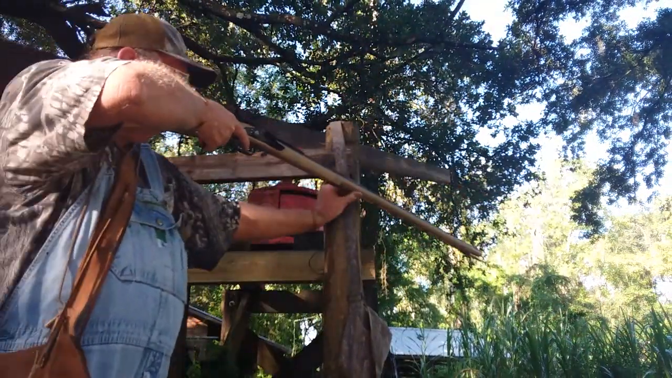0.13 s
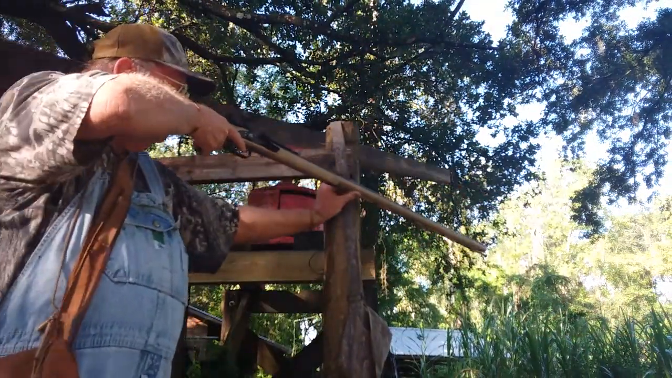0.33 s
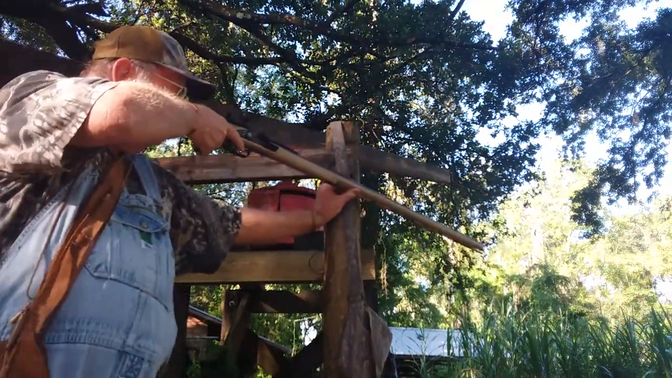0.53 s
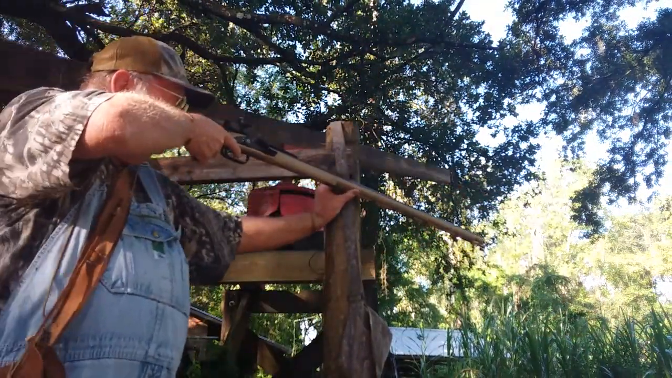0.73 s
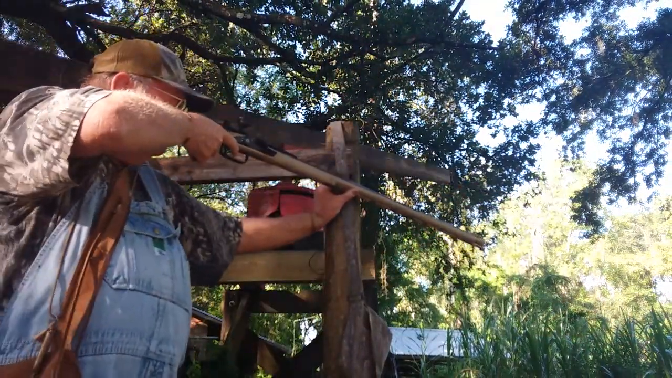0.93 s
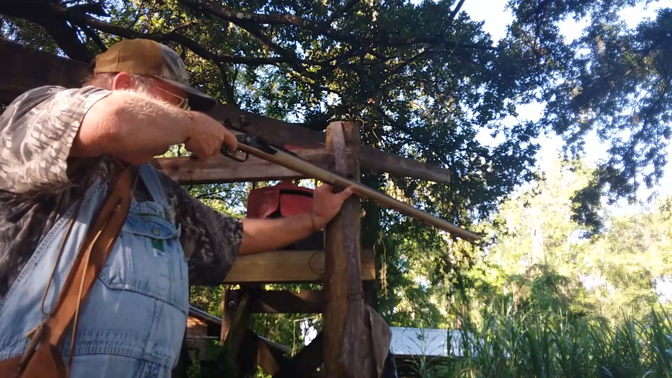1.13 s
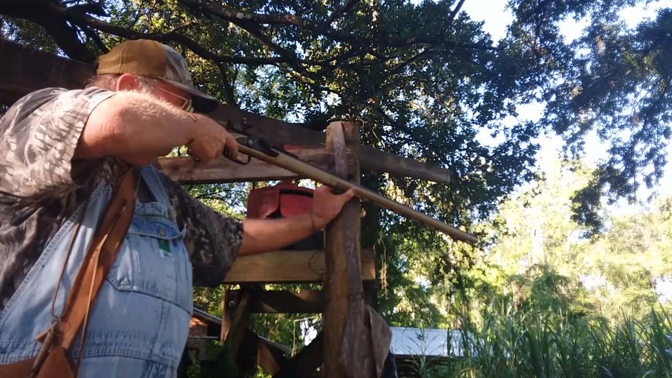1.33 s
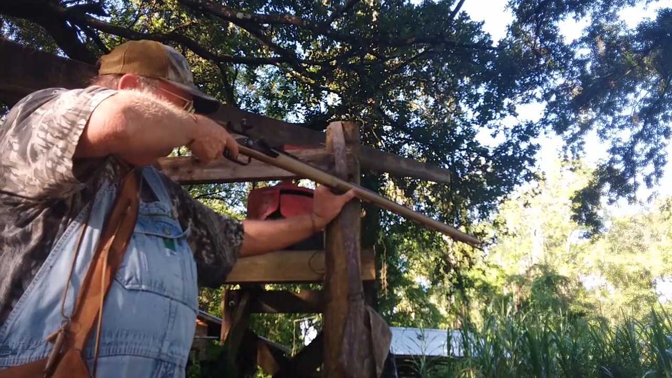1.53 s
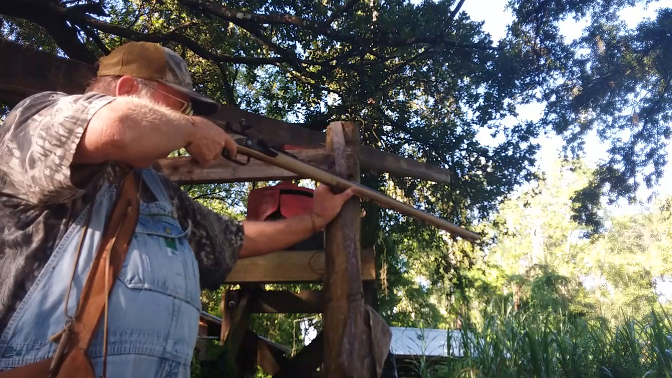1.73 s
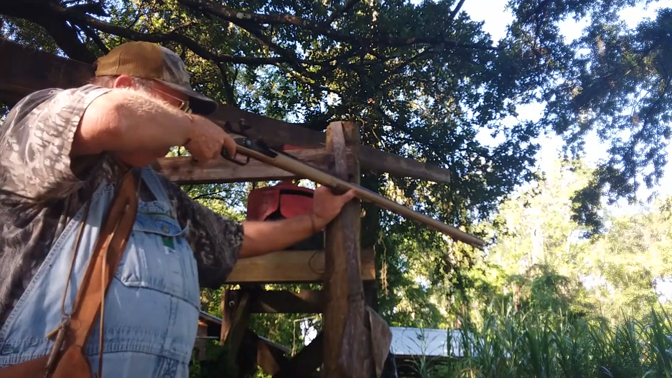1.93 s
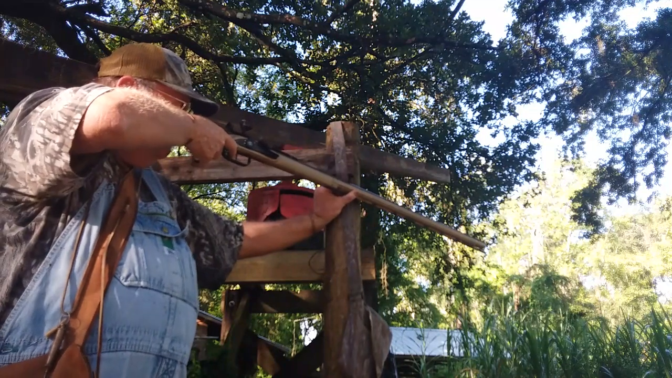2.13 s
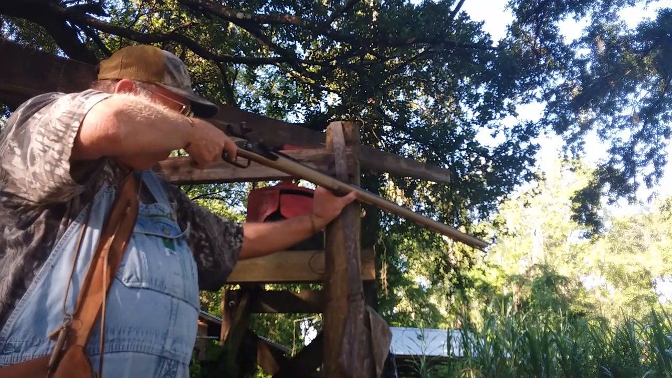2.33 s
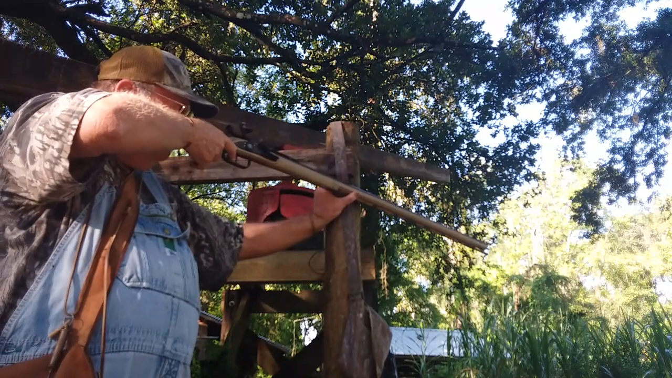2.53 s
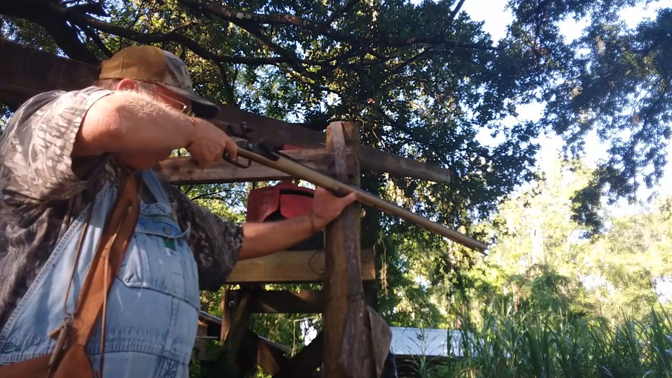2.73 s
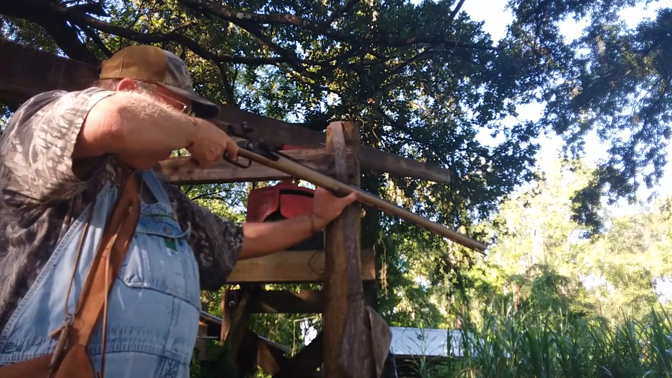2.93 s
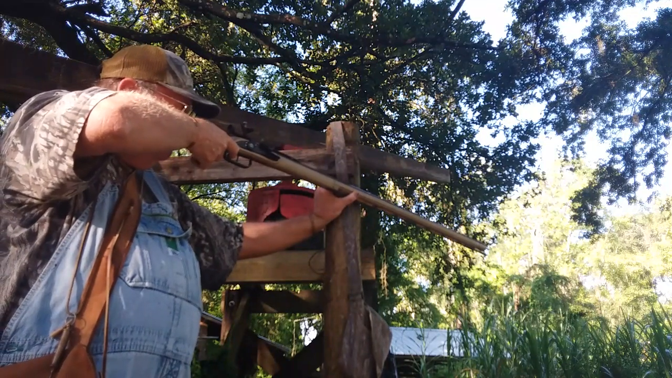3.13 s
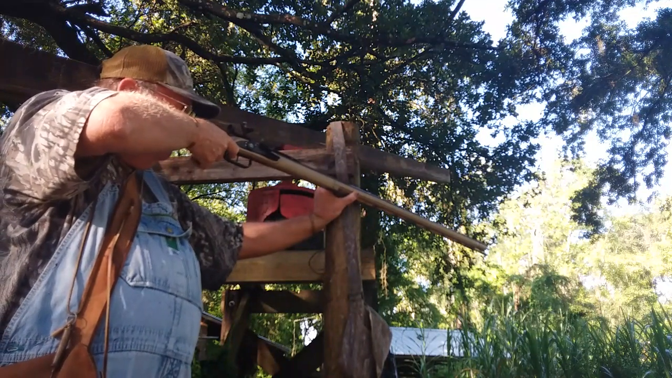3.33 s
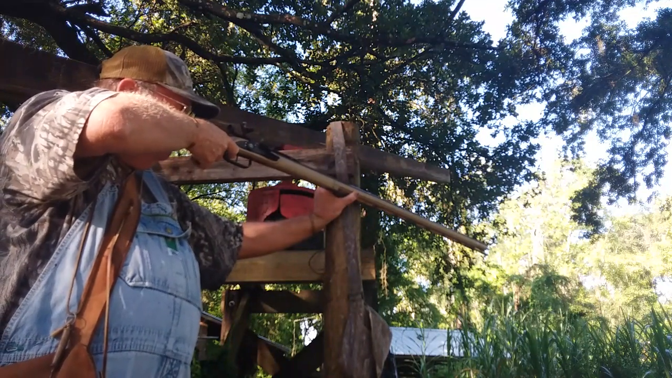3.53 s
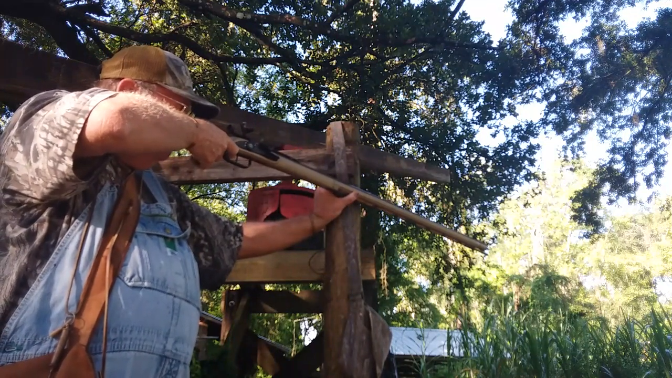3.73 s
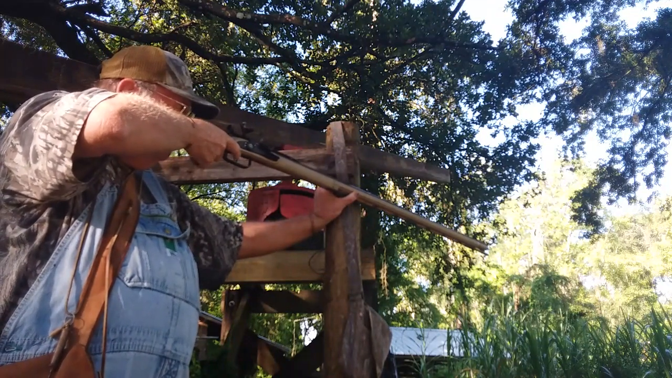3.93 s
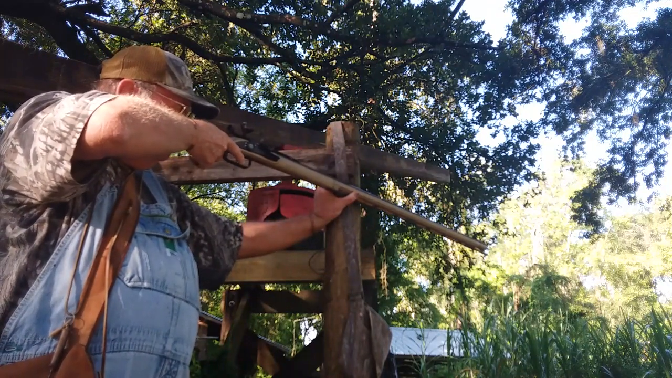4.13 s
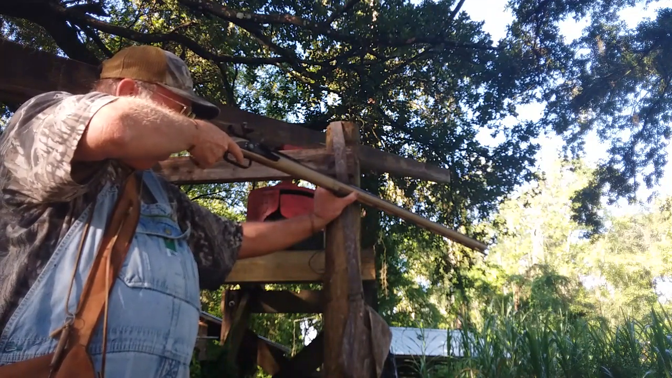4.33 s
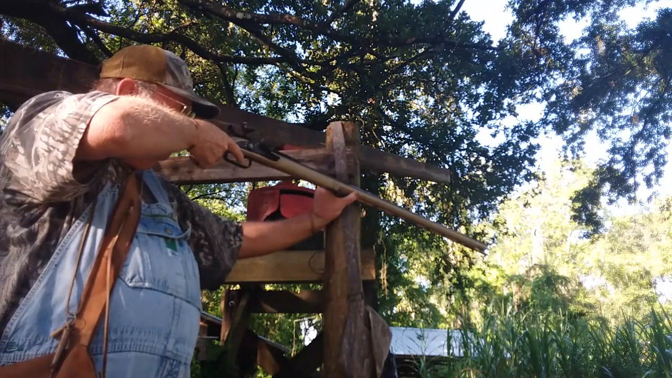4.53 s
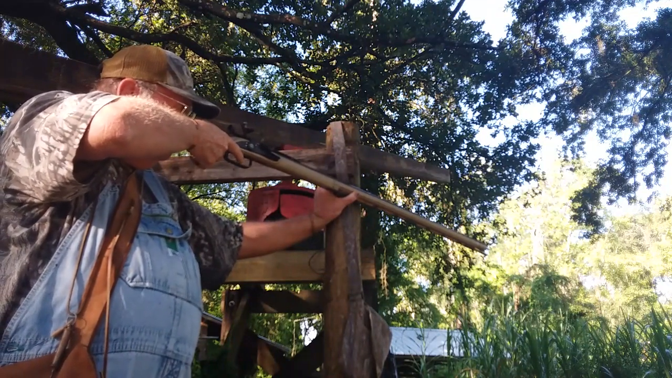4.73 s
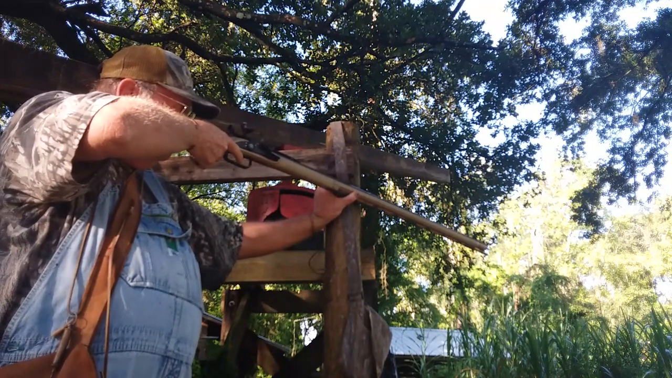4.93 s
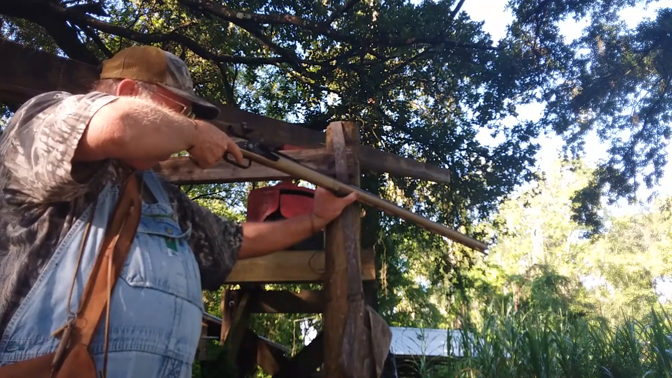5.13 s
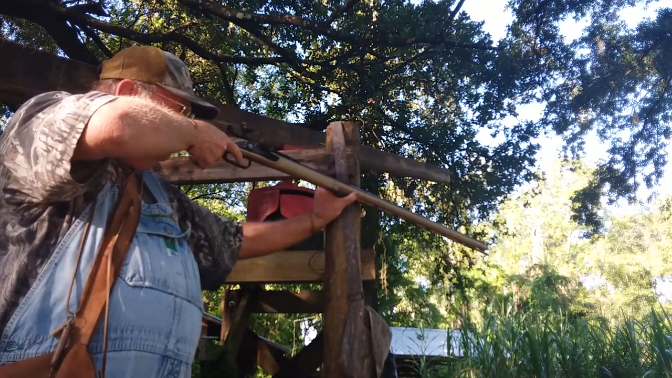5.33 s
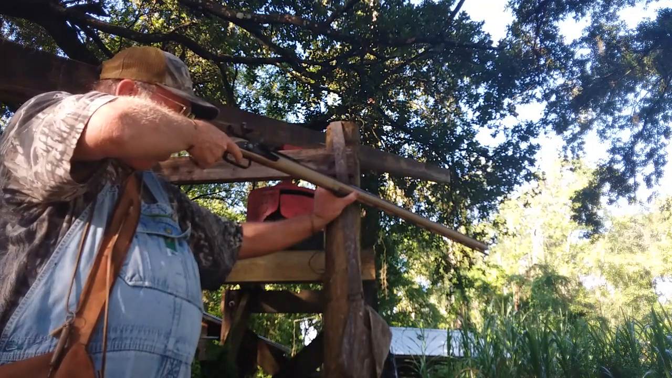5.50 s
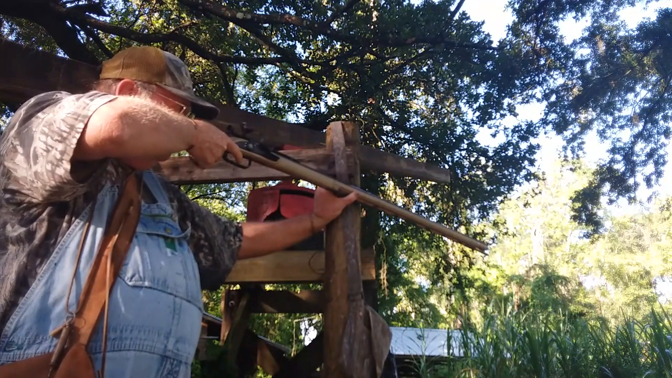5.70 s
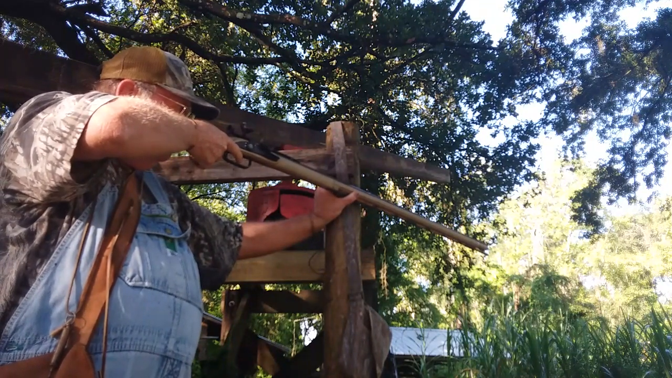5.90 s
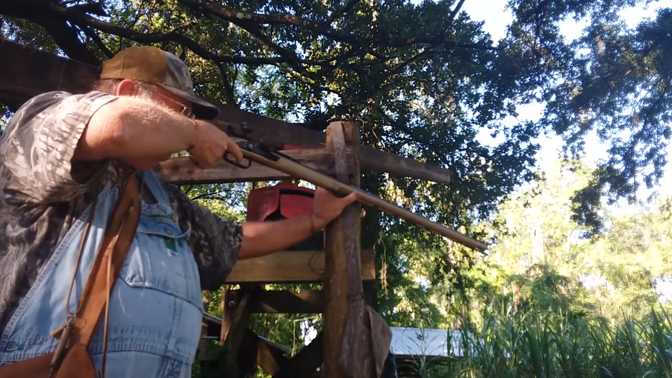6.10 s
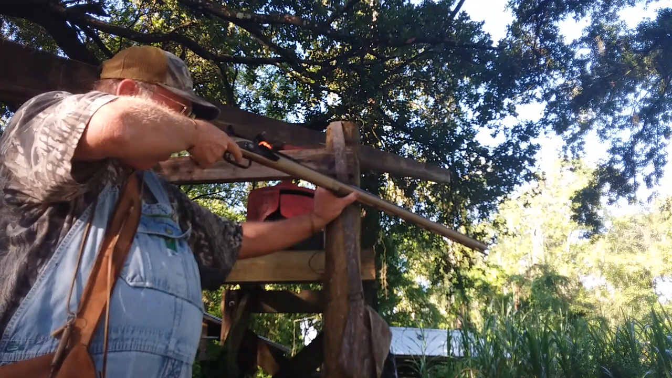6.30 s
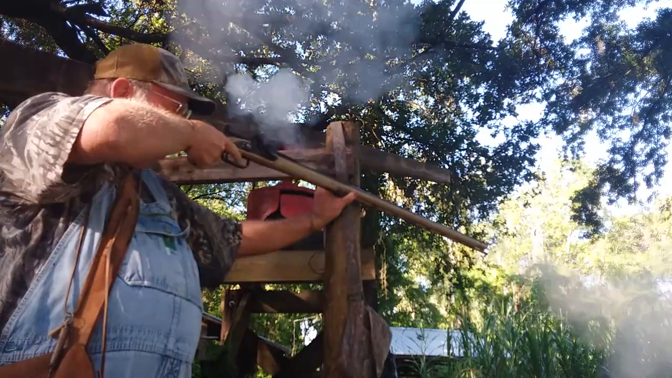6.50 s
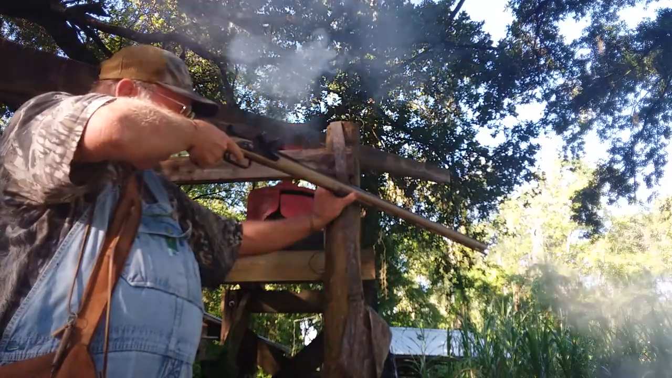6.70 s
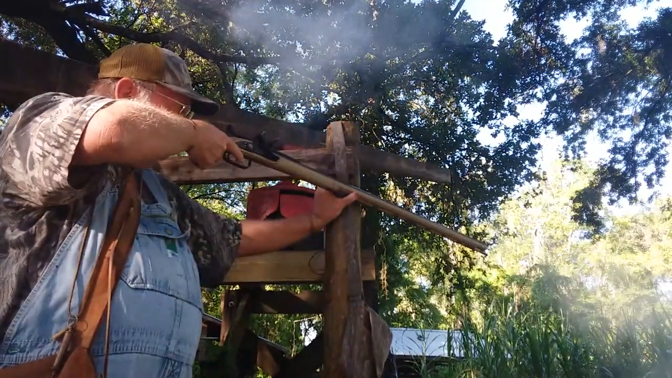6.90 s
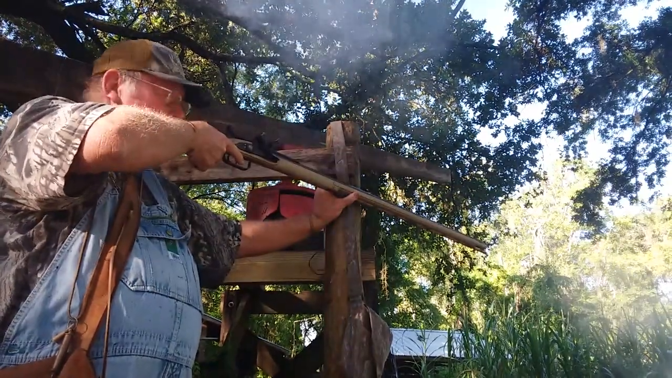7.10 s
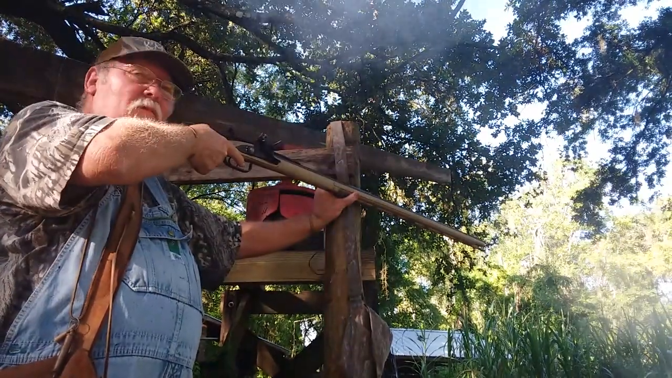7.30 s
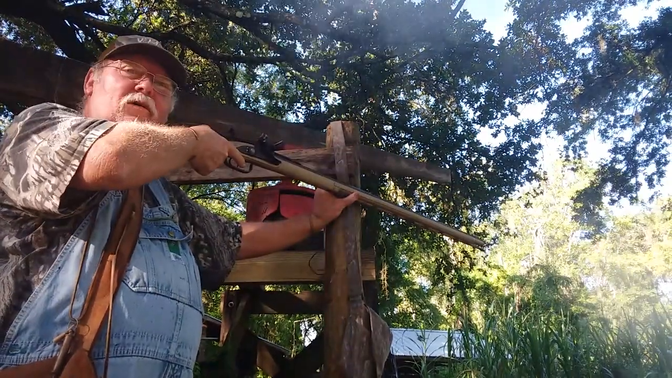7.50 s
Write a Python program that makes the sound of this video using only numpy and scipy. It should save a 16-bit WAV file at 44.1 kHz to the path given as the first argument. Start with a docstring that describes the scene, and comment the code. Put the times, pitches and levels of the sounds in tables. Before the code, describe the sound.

Beside a man aiming a flintlock, one microphone hears soft fabric rubs and light taps on wood, one of them a hard clack, over quiet air and insects. Distant hoarse crows and a thin bird whistle come and go around a small metallic double click. Then a bright metal clatter runs almost at once into a hiss and a massive blast, with crackling echoes rolling away to the end and the background pushed down.

```python
"""Edge of a wood, one microphone beside the shooter, over steady air, insects and a distant engine.
Cloth rustles and the stock is knocked as a flintlock rifle is shouldered; far crows start to caw.
A songbird whistles as the set trigger clicks, and whistles again before flint and frizzen clatter.
The pan fizzes, then the charge goes off: noise, shaped band by band, dies away as echoes off the trees.
The recorder turns its gain far down at the blast and stays low."""
import sys
import numpy as np
from scipy import signal
from scipy.fft import rfft, irfft
from scipy.io import wavfile
from scipy.ndimage import uniform_filter1d

SR = 44100
rng = np.random.default_rng(int(sys.argv[2]) if len(sys.argv) > 2 else 0)


def master_out(mix):
    """Clip the mix to full scale and print it as 16-bit PCM to the path in sys.argv[1]."""
    frames = np.transpose(np.atleast_2d(mix))
    ceiling = np.clip(frames, -1, 1)
    pcm = np.round(ceiling * 32767).astype(np.int16)
    wavfile.write(sys.argv[1], SR, pcm)


N = 333173

# relative spectrum of the blast: [f/Hz, density/dB per Hz]
BLAST_SPECTRUM = [(30, -57), (55, -25.5), (100, 2), (200, -9.5), (400, -4), (800, -8.5), (1600, -8.5),
                  (3000, -6.5), (4500, -6.5), (7000, -10.5), (9500, -10.5), (10800, -18.5), (12500, -10.5),
                  (15700, -8.5)]
# how long the near and the far stands of trees ring in each band: [f/Hz, t60/s]
NEAR_TREES = [(60, 0.46), (150, 0.87), (400, 0.49), (1200, 0.82), (3000, 0.7), (6000, 0.67), (10000, 0.65),
              (15000, 0.41)]
FAR_TREES = [(60, 2.3), (300, 1.425), (1000, 1.714), (3000, 1.323), (6000, 1.134), (15000, 0.48)]
# brief, louder patches in the echo tail: [t/s, lift/dB, centre f/Hz, length/s]
LOUD_PATCHES = [(6.426, 2, 354, .035), (6.507, 0.5, 117, .065), (6.532, 5, 6250, .06),
                (6.687, 2.5, 3520, .055), (6.96, 2, 2500, .02), (7.075, 2.5, 1500, .02),
                (7.385, 4, 1800, .025), (7.45, 2.5, 1990, .03), (7.54, 3, 1500, .03)]
# single slaps off sheds and banks: [t/s, level over the echoes around/dB, f/Hz]
SLAPS = [(6.392, 0, 334), (6.408, 4.5, 798), (6.434, -1, 447), (6.447, 0, 297), (6.459, 2, 449),
         (6.496, -1.5, 895), (6.506, 1, 140), (6.536, -1, 171), (6.555, -3, 200), (6.584, -5, 170.5)]
# hiss of the priming powder: [t/s, level/dB]
PAN_HISS = [(6.256, -37), (6.275, -27.5), (6.31, -22.5), (6.335, -33.5), (6.36, -37.5)]
# blows inside the lock, set trigger first, then cock, flint and bouncing frizzen:
# [t/s, level before colouring/dB, brightness/dB per octave, scrape share/0-1, damping t60/s]
LOCK_BLOWS = [(3.5754, -13, 4.5, 0.3, 0.04), (3.5775, -14, 5, .4, 0.041), (3.580, -20, 0, .06, .1),
              (6.257, 0, 1, 0.66, .022), (6.2607, -13, 2, .9, .014), (6.265, -7, 1, .4, 0.0097),
              (6.2731, -6.5, 0, .6, .02), (6.2739, -1.5, -2, 0.8, 0.055), (6.280, -8, -3.5, .7, 0.015),
              (6.2906, -2.5, 0.5, .7, .016), (6.3023, -8, 0.5, .6, 0.016), (6.3109, -7, -1.5, .7, 0.013),
              (6.3175, -17, -6, .7, .014)]
# ringing modes of the lock parts, before the grip damps them: [f/Hz, base level/dB, t60/s]
LOCK_MODES = [(1160, -22, 0.057), (1730, -16, .05), (2200, -24, .043), (3230, -16.5, 0.022),
              (4380, -6.5, .025), (5750, -3.5, 0.013), (6570, -8, 0.039), (7450, -4.5, 0.035),
              (8390, -7, .024), (9300, -10.5, 0.036), (9900, -9, .03), (11100, -22.5, .035),
              (12340, -20, .037), (13800, -18.5, .03), (15200, -12, .03), (15200, -16, .03)]
# knocks and light taps on the wooden stock and rail: [t/s, peak level/dB, f/Hz, t60/s]
TAPS = [(.258, -43, 780, .036), (0.307, -47, 495, 0.046), (0.361, -46.5, 477, 0.017),
        (.442, -45, 4020, 0.0087), (.55, -48, 800, 0.017), (0.638, -46, 1000, 0.015),
        (.714, -50, 890, .014), (.885, -48, 3200, 0.019), (.997, -47, 2500, .01),
        (1.049, -29, 1750, 0.0078), (1.0497, -18.5, 3520, 0.017), (1.053, -28.5, 3200, 0.023),
        (1.104, -47, 3000, .01), (1.128, -50.5, 315, 0.046), (1.348, -38, 2780, 0.039),
        (1.377, -46, 1270, 0.036), (2.539, -52, 3000, .01), (3.769, -45.5, 4500, .009)]
# cloth and leather as the rifle comes up, one row a rub; the first row would start before zero, # so it is
# mixed in at the very end of the scene instead, a faint rise cut off before its peak: # [peak t/s, level/dB,
# swell/s, scuff level/dB, scuff f at the peak/Hz]
RUBS = [(.1, -63, .12, -80, 800), (.245, -44.5, 0.045, -57, 750), (.29, -46.5, 0.014, -52.5, 590),
        (0.361, -55.5, 0.083, -61, 417), (.45, -62, .05, -74, 500), (.53, -43, 0.028, -62, 690),
        (.62, -46.5, 0.044, -59.5, 746), (.69, -52, 0.045, -67, 800), (.8, -61, .06, -81, 800),
        (.89, -54.5, 0.036, -70, 600), (.98, -55.5, 0.053, -61.5, 547), (1.1, -63, .04, -66, 600),
        (1.39, -56.5, 0.048, -69, 705)]
# relative spectrum of rubbing cloth: [f/Hz, density/dB per Hz]
CLOTH_SPECTRUM = [(590, -31), (1000, -10), (2460, -4.5), (4320, -3), (7010, -3.5), (8820, 0), (11000, -9.5),
                  (12900, -5), (15700, -7)]
# songbird, one row a note that slides and settles:
# [t/s, length/s, starting level/dB, from f/Hz, to f/Hz, slide/s]
WHISTLES = [(3.099, .19, -76.5, 3400, 3020, .1), (3.37, 0.19, -69, 3780, 3335, .042),
            (5.918, 0.053, -77, 3700, 2830, .045), (5.963, 0.08, -61.5, 2680, 3280, 0.056),
            (6.052, 0.075, -65.5, 3300, 4310, .06), (6.142, 0.089, -62.5, 3850, 3740, .05)]
# far crows, one row a caw: [t/s, length/s, level/dB, f halfway through/Hz, overtone level/dB,
# share of the caw at which the low partial is loudest/0-1]
CAWS = [(0.798, 0.11, -70, 1290, -6, .5), (1.402, 0.19, -75, 1300, 1, .5),
        (1.857, .44, -72.5, 1300, 5, 0.83), (2.38, 0.14, -74, 1440, 1, .4), (2.478, 0.27, -72, 1234, 1, 1),
        (3.138, 0.24, -72, 1275, -0.5, .55), (3.698, 0.27, -68, 1310, -3, 0.61),
        (4.257, 0.31, -69, 1264, -3, 0.61), (4.858, 0.27, -66, 1300, -4.5, 0.55),
        (5.677, .16, -92, 1270, 16, .5), (5.936, .16, -69, 1370, 2, .6)]
# relative spectrum of the open air, rumble and broad hiss: [f/Hz, density/dB per Hz]
AIR_SPECTRUM = [(20, -35.5), (40, -21.5), (85, 4.5), (130, -5.5), (200, -13), (300, -29), (420, -32.5),
                (800, -33.5), (1400, -36.5), (5250, -37.5), (5600, -25), (7000, -36.5), (10500, -28.5),
                (15700, -26.5)]
# high hissing bands of the insects: [f/Hz, width/Hz, level before the slight dips/dB]
INSECT_BANDS = [(6120, 530, -66.5), (8575, 1390, -57.5), (12300, 1700, -64.5)]
# slight dips in the level of the high hiss bands: [t/s, level/dB]
HISS_LEVEL = [(0, 0), (1.1, -1.5), (1.6, 0), (7.6, -1.5)]
# far road: [t/s, engine drone level/dB, low wash level/dB]
TRAFFIC = [(0, -74, -68.5), (.5, -53.5, -64), (1.4, -57, -69), (3.2, -54, -71.5), (3.9, -64.5, -74.5),
           (5.1, -60, -75), (6.2, -64, -72.5)]

SHOT_S, BLAST_RISE_S = 6.3562, .007
BASS_RISE_S = 0.016  # time constant of the build-up of a 300 Hz echo; higher tones are quicker
CRACKLE_DB = 1.7  # unevenness of the single echoes
RUB_SLOPE_DB, RUB_FADE = 8.5, 1.3  # dB lost per swell time; the fade is this much slower than the rise
SCUFF_SAG = 1.5  # rate at which the scuff pitch sinks, per second
TAP_WIDTH_HZ, TAP_WIDENING = 590, 1.26  # width of a 1 kHz tap; higher taps broaden by this power
CAW_RISE, OVER_RATIO, OVER_RISE = .05, 1.97, .08  # pitch climbs through the caw, the overtone more
OVER_PEAK, CAW_ENDS_DB = 0.48, -9.5  # share of the caw where the overtone peaks; level at the ends
THIRD_DB = -5.5  # third partial, only a haze
NOTE_EDGE, NOTE_RISE_DB = 0.15, 1  # share of a note spent swelling and dying; level gained by its end
WARBLE, BIRD_ECHO_DB = .016, 5  # rms pitch wobble as a share of the pitch; echo filter gain
AIR_DB, ENGINE_HZ, ENGINE_WIDTH_HZ = -54, 94.3, 26.6
RECOVER_DB_PER_S = 2.2  # the slow gain control lets go this fast
LAG = 90  # samples by which the level sensing trails
CEILING, TREBLE_EDGE_HZ, SELF_NOISE_DB = 1.35, 15800, -74  # CEILING: full scale is 1


def shot():
    """The blast returns from trunks and boughs: uneven echoes, each band dying at its own speed."""
    t = np.arange(N - round(SHOT_S * SR)) / SR

    def field_db(hz, s):
        """Near and far stands of trees, plus a few brief, louder patches."""
        near = gain_of(-60 * s / read(NEAR_TREES, hz))
        far = gain_of(-20.0 - 60 * s / read(FAR_TREES, hz))
        lift = 0
        for at, db, mid, length in LOUD_PATCHES:
            octaves = np.log2((hz + 1) / mid)
            lift = lift + db * np.exp(-((s + SHOT_S - at) / length) ** 2 - octaves ** 2 / 0.73)
        build_up = -9 * np.exp(-s * (hz + 1) / 300 / BASS_RISE_S)
        return read(BLAST_SPECTRUM, hz) + 10 * np.log10(near ** 2 + far ** 2) + lift + build_up

    tail = shape(lumps(len(t), size=28, spread_db=CRACKLE_DB), field_db, size=1024)
    flicker = evened(uniform_filter1d(rng.standard_normal(len(t)), size=900))
    tail = tail * gain_of(0.87 * flicker)  # slow random flicker of the whole tail
    tail = tail + slaps(tail)
    onset = np.clip(t / BLAST_RISE_S, 0, 1) ** 3
    return SHOT_S, gain_of(26) * tail / np.std(tail[:4000]) * onset


def slaps(tail):
    """Each slap is one pulse about a cycle long, scaled by the level of the diffuse echoes around it."""
    t, out = np.arange(len(tail)) / SR + SHOT_S, np.zeros(len(tail))
    around = np.sqrt(abs(uniform_filter1d(tail ** 2, size=2000)))
    for s, db, hz in SLAPS:
        turns = (t - s) * hz
        out += gain_of(db) * np.exp(-(1.6 * turns) ** 2) * np.sin(2 * np.pi * turns)
    return out * around


def flash():
    """The priming powder burns in the pan with a fizz and a soft low puff, both bands of noise."""
    t = np.arange(PAN_HISS[0][0], PAN_HISS[-1][0], 1 / SR)
    noise = rng.standard_normal((len(t), 2)).T
    fizz = gain_of(along(PAN_HISS, t)[0]) * band(noise[0], 6000, 9000)
    puff = gain_of(-30) * band(noise[1], 250, 300) * np.exp(-((t - 6.338) / 0.0079) ** 2)
    return t[0], fizz + puff


def blow(s, level_db, bright_db, scrape, t60):
    """Steel on steel: the lock's modes ring under a brief scrape of noise; the grip damps both."""
    t = np.arange(4000) / SR
    ring = np.zeros(len(t))
    for hz, db, ring_s in LOCK_MODES:
        extra, phase = rng.random(2)  # every blow excites the modes a little differently
        ring += gain_of(db + 2.3 * extra - 60 * t / ring_s) * np.sin(2 * np.pi * (hz * t + phase))
    scrape = np.clip(scrape, 0, 1)
    hit = (1 - scrape) * ring / abs(ring).max() + scrape * 0.2 * rng.standard_normal(len(t))
    hit = hit * gain_of(-60 * t / max(t60, .003)) * np.minimum(t / .0008, 1)
    hz = np.fft.rfftfreq(len(t), 1 / SR)
    bass_cut_db = 22 * np.maximum(np.log2(1050 / (hz + 50)), 0)
    colour_db = bright_db * np.log2((hz + 500) / 6000) - bass_cut_db
    hit = gain_of(level_db) * irfft(rfft(hit / abs(hit).max()) * gain_of(colour_db))
    return s, scatter(hit, wet_db=-20, delay_s=0.03, t60=0.35)


def tap(s, peak_db, hz, t60):
    """A short dry noise burst around one tone, with a faint slap from nearby posts."""
    t = np.arange(6000) / SR
    noise = rng.standard_normal((len(t), 2)).T
    burst = noise[0] * gain_of(-60 * t / max(t60, .003)) * np.minimum(t / 0.00053, 1)
    slap = gain_of(-32 - 60 * t / 0.3) * noise[1]
    tone = band(burst + slap, hz, TAP_WIDTH_HZ * (hz / 1000) ** TAP_WIDENING)
    tone = signal.lfilter(*signal.butter(2, min(0.2 * hz, 5000), "high", fs=SR), tone)
    return s, gain_of(peak_db) * tone / abs(tone).max()


def rustle(s, level_db, swell_s, scuff_db, scuff_hz):
    """Dense uneven grains of rubbing cloth swell and fade, with a dull scuff below."""
    t = np.arange(-8000, 12000) / SR
    grains = lumps(len(t), size=64, spread_db=2.5)

    def cloth_db(hz, s):
        """The cloth spectrum, cut by 12 dB an octave more below 1 kHz."""
        return read(CLOTH_SPECTRUM, hz) - 12 * np.maximum(np.log2(1000 / (hz + 1)), 0)

    fibres = gain_of(level_db) * evened(shape(grains, cloth_db, size=512))
    scuff = gain_of(scuff_db) * band(grains, scuff_hz * np.exp(-SCUFF_SAG * t), 820)
    swell = gain_of(-RUB_SLOPE_DB * np.maximum(-t, t / RUB_FADE) / swell_s)
    return s + t[0], swell * signal.windows.tukey(len(t), .2) * (fibres + scuff)


def whistle(s, length, level_db, from_hz, to_hz, slide_s):
    """The songbird's note: a near sine that slides, settles and wobbles, trailed by its echo."""
    t = np.arange(0, length, 1 / SR)
    hz = to_hz + (from_hz - to_hz) * np.maximum(1 - t / slide_s, 0)
    wobble = evened(uniform_filter1d(rng.standard_normal(len(t)), size=300))
    hz = hz * (1 + WARBLE * wobble)
    level = gain_of(level_db + NOTE_RISE_DB * t / length) * signal.windows.tukey(len(t), NOTE_EDGE)
    tone = level * np.sin(2 * np.pi * np.cumsum(hz) / SR)
    return s, scatter(tone, wet_db=BIRD_ECHO_DB, delay_s=.03, t60=0.54)


def caw(s, length, level_db, hz, over_db, low_peak):
    """A hoarse far call: two fuzzy partials, each a narrow core in a wider haze, and a third of haze."""
    u = np.arange(0, length, 1 / SR) / length  # share of the caw gone by
    low_hz = hz * (1 + CAW_RISE * (u - .5))
    over_hz = OVER_RATIO * hz * (1 + OVER_RISE * (u - .5))
    noise = rng.standard_normal((len(u), 5)).T
    low = 0.61 * band(noise[0], low_hz, 72) + 0.8 * band(noise[1], low_hz, 270)
    high = 0.48 * band(noise[2], over_hz, 140) + 0.8 * band(noise[3], over_hz, 720)
    high = high + gain_of(THIRD_DB) * band(noise[4], 1.4 * over_hz, 900)
    ends_db = [CAW_ENDS_DB, 0, CAW_ENDS_DB]
    low_db = np.interp(u, [0, low_peak, 1], ends_db)
    high_db = np.interp(u, [0, OVER_PEAK, 1], ends_db)
    call = gain_of(low_db) * low + gain_of(over_db + high_db) * high
    return s, gain_of(level_db) * call * signal.windows.tukey(len(u), .3)


def outdoors():
    """Broad air, high bands of insects, a low wash and the wavering drone of a far engine, all noise."""
    t = np.arange(N) / SR
    air = shape(rng.standard_normal(N), lambda hz, s: read(AIR_SPECTRUM, hz), size=2048)
    air = gain_of(AIR_DB) * evened(air)
    insects = sum(gain_of(db) * band(rng.standard_normal(N), hz, width) for hz, width, db in INSECT_BANDS)
    drone_db, wash_db = along(TRAFFIC, t)
    drone = gain_of(drone_db) * band(rng.standard_normal(N), ENGINE_HZ, ENGINE_WIDTH_HZ)
    wash = gain_of(wash_db) * band(rng.standard_normal(N), 242, 150)
    return air + insects * gain_of(along(HISS_LEVEL, t)[0]) + drone + wash


def scatter(x, wet_db, delay_s, t60):
    """The sound and its diffuse echo off posts and branches: decaying noise that builds up over delay_s."""
    t = np.arange(SR // 2) / SR
    echo = rng.standard_normal(len(t)) * gain_of(-60 * t / t60) * np.clip(t / delay_s, 0, 1) ** 3
    wet = gain_of(wet_db) * signal.fftconvolve(x, echo / np.linalg.norm(echo))
    add(wet, 0, x)
    return wet


def lumps(count, size, spread_db):
    """Noise in short grains of uneven strength."""
    strength = np.minimum(rng.exponential(1, count // size + 1), 3.5)
    return rng.standard_normal(count) * gain_of(spread_db * np.repeat(strength, size)[:count])


def shape(x, field_db, size):
    """Weights the short-time spectra of x by a dB field over (f/Hz, t/s)."""
    overlap = size * 3 // 4
    hz, t, z = signal.stft(x, SR, nperseg=size, noverlap=overlap)
    weighted = z * gain_of(field_db(hz[:, None], t))
    return signal.istft(weighted, SR, nperseg=size, noverlap=overlap)[1][:len(x)]


def resonate(x, hz, width):
    """Shifts hz down to zero, smooths and shifts back: a resonance of gain 1."""
    turn = np.exp(2j * np.pi * np.cumsum(hz * np.ones(len(x))) / SR)
    r = np.exp(-np.pi * width / SR)
    return 2 * (turn * signal.lfilter([1 - r], [1, -r], x / turn)).real


def band(x, hz, width):
    """A steep resonance, two in a row, at rms 1."""
    return evened(resonate(resonate(x, hz, width), hz, width))


def evened(x):
    """Scales to rms 1."""
    return x / np.sqrt(np.mean(x ** 2) + 1e-20)


def gain_of(db):
    """dB to gain."""
    return 10 ** (np.asarray(db) / 20)


def read(points, hz):
    """Reads a spectrum table on a log-frequency axis."""
    f, value = np.transpose(points)
    return np.interp(np.log(hz + 1), np.log(f + 1), value)


def along(rows, t):
    """Reads every column of a curve at the times t."""
    s, *columns = np.transpose(rows)
    return [np.interp(t, s, c) for c in columns]


def add(mix, s, sound):
    """Mixes a sound in at time s; a negative s counts back from the end."""
    part = mix[round(s * SR):][:len(sound)]
    part += sound[:len(part)]


def scene():
    """Everything at one microphone beside the shooter."""
    mix = outdoors()
    for source, rows in [(blow, LOCK_BLOWS), (tap, TAPS), (rustle, RUBS), (whistle, WHISTLES), (caw, CAWS)]:
        for row in rows:
            add(mix, *source(*row))
    add(mix, *flash())
    add(mix, *shot())
    return mix[None]


def record(dry):
    """A small microphone drops deep bass; a quick limiter holds the blast, a slow gain stays low after it."""
    heard = signal.lfilter(*signal.butter(2, 45, "high", fs=SR), dry)
    power = abs(uniform_filter1d(heard[0] ** 2, size=300, origin=LAG))
    power_db = 10 * np.log10(power + 1e-12)
    t = np.arange(N) / SR
    # both reductions jump up with the level and sink at a steady rate
    quick_db = np.maximum.accumulate(power_db + 250 * t) - 250 * t + 9
    recovery_db = RECOVER_DB_PER_S * t
    slow_db = np.maximum.accumulate(np.minimum(power_db + .6, 23) + recovery_db) - recovery_db
    down_db = uniform_filter1d(np.maximum(np.maximum(quick_db, slow_db), 0), size=150)
    held = np.clip(CEILING * np.tanh(heard / gain_of(down_db) / CEILING), -1, 1)
    hiss = evened(np.diff(rng.standard_normal(N + 1)))  # thin electronic hiss after the gain stage
    held = held + gain_of(SELF_NOISE_DB) * hiss
    treble_cut = signal.firwin(511, TREBLE_EDGE_HZ, window=("kaiser", 9), fs=SR)
    return signal.oaconvolve(held, treble_cut[None], "same")


dry = scene()
out = record(dry)
master_out(out)
```